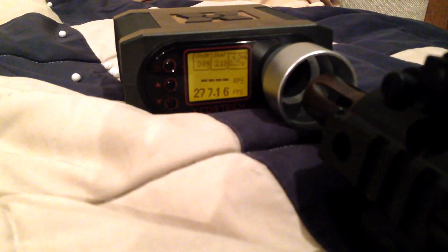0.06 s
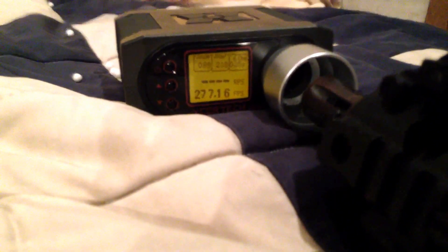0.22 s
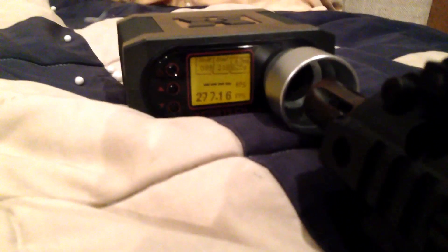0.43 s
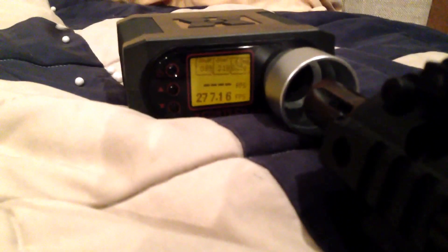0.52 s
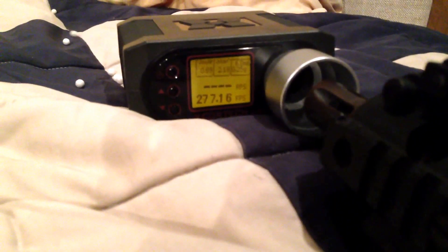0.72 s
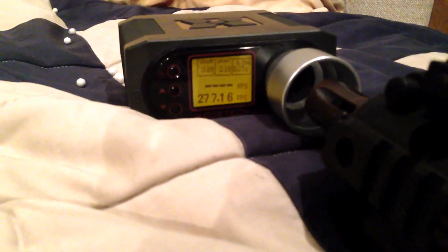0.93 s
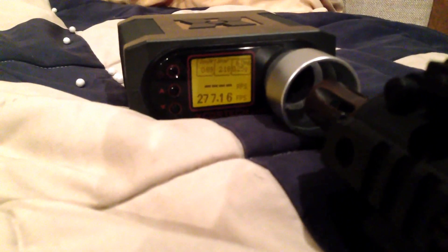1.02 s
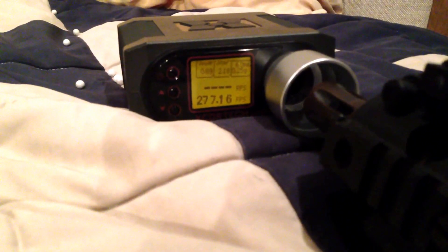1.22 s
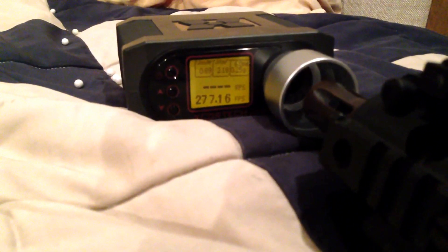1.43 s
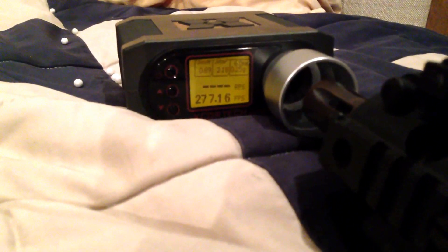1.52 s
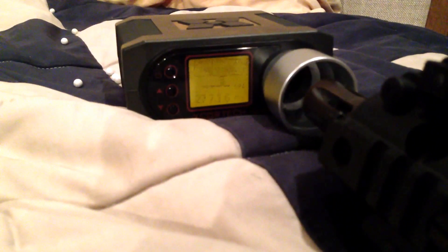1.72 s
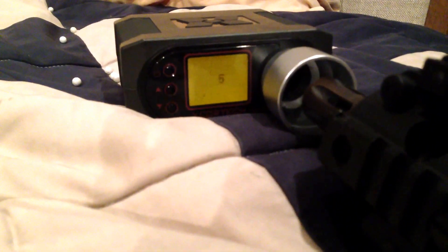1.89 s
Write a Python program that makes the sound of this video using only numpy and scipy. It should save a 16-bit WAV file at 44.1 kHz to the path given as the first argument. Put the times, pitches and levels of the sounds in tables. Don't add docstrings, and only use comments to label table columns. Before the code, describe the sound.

Close, loud and slightly saturated burst from a toy pellet gun, about nine strokes blurred into a buzzing rattle, ringing briefly in a bedroom; afterwards near quiet with faint hiss, small plastic ticks and dull drops.

```python
import sys
import numpy as np
from scipy import signal
from scipy.fft import rfft, irfft, next_fast_len
from scipy.io import wavfile
from scipy.ndimage import map_coordinates

SR = 44100
rng = np.random.default_rng(int(sys.argv[2]) if len(sys.argv) > 2 else 0)


def ratio(d):
    e = np.asarray(d, float) / 20
    return 10 ** e


def master(y):
    cut = np.clip(np.atleast_2d(y).T, -1, 1)
    pcm = np.round(cut * 32767)
    wavfile.write(sys.argv[1], SR, pcm.astype(np.int16))


N = 85995
T = np.arange(N) / SR


def unit(x):
    return x / np.sqrt(np.mean(x ** 2) + 1e-20)


def along(points, hz):
    f, v = np.transpose(points)
    return np.interp(np.log(hz + 1), np.log(f + 1), v)


def filtered(x, response):
    m = next_fast_len(len(x) + SR // 4)
    return irfft(rfft(x, m) * response(np.fft.rfftfreq(m, 1 / SR)), m)[:len(x)]


def coloured(x, points):
    return filtered(x, lambda f: ratio(along(points, f)))


def highpass(x, hz, order):
    return filtered(x, lambda f: (1j * f / (hz + 1j * f)) ** order)


def lowpass(x, hz):
    return filtered(x, lambda f: 1 / (1 + 1j * f / hz) ** 2)


def peaks(table, shift=1):
    def response(f):
        total = 0
        for k, (hz, width, db) in enumerate(table):
            drive = 1j * f * width
            total = total + (-1) ** k * ratio(db) * drive / ((hz * shift) ** 2 - f * f + drive)
        return total
    return response


def add(out, s, x):
    part = out[round(s * SR):][:len(x)]
    part += x[:len(part)]


def level_track(points):
    s, db = np.transpose(points)
    return np.interp(T, s, db, left=-120, right=-120)


def ring(hz, t60):
    t = np.arange(SR // 10) / SR
    return np.sin(2 * np.pi * hz * t) * ratio(-60 * t / t60)


def contacts(size, per_s, spread_db):
    chance, side, force = rng.random((size, 3)).T
    knocks = (chance < per_s / SR) * np.sign(side - .5)
    return unit(knocks * ratio(-spread_db * np.log(force + .01)))


def rattle(length, rise, t60, per_s, table, shift=1, fade_db=0, first=0):
    t = np.arange(SR // 10) / SR
    fall = ratio(-fade_db * t - 60 * np.clip(t - length, 0, 1) / t60)
    hits = contacts(len(t), per_s, 2.4) * np.clip(t / rise, 0, 1) * fall
    hits[round(rise * SR)] += first
    x = filtered(hits, peaks(table, shift))
    return x / (np.std(x[t < length + .002]) + 1e-9)


def hits(rows, modes):
    out = np.zeros(N)
    for s, db, length, shift in rows:
        first = 5 * (length < .005)
        add(out, s, ratio(db) * rattle(length, .00039, .011, 5000, modes, shift, first=first))
    return out


# start_s, slam_lag_s, rattle_s
STROKE_TIMES = [
    (.2335, .0003, .003),
    (.2362, .0022, .004),
    (.2447, .0016, .0025),
    (.2708, .0012, .004),
    (.2911, .0012, .0035),
    (.3124, .0004, .002),
    (.3303, .0001, .008),
    (.3496, .001, .003),
    (.3738, .001, .003),
]
# level_db, shell_knock_db
STROKE_FORCES = [
    (-18, -20.5),
    (-10.5, -7.5),
    (-7.5, -21),
    (-8.5, -29),
    (-9.5, -28),
    (-11, -30),
    (-8, -31),
    (-8.5, -30.5),
    (-7.5, -33),
]
# centre_hz, width_hz, level_db
GUN_BODY = [(745, 930, -10), (1404, 580, -5), (2840, 380, -3), (3300, 400, -3), (5370, 500, -11),
            (5950, 900, -12.5), (7240, 790, -13.5), (9960, 1900, -17.5), (11600, 3800, -25)]
PUFF_HZ, PUFF_T60, PUFF_DB = 1063, .0085, 5.5
SLAM_T60, SLAMS_PER_S = .008, 7000


def strokes():
    out = np.zeros(N)
    for (s, lag, length), (db, shell_db) in zip(STROKE_TIMES, STROKE_FORCES):
        tick = ring(2837 * (1 + .01 * rng.standard_normal()), .024)
        puff = ring(PUFF_HZ * (1 + .03 * rng.standard_normal()), PUFF_T60)
        shell = ring(276, .053)
        shift = 1 + .045 * rng.standard_normal()
        slam = rattle(length, .0004, SLAM_T60, SLAMS_PER_S, GUN_BODY, shift, fade_db=1199, first=2.5)
        add(out, s, ratio(db + PUFF_DB) * puff + ratio(shell_db) * shell)
        add(out, s + lag, ratio(db - 2.5) * tick + ratio(db - 3) * slam)
    return out


# start_s, level_db
REBOUND_HITS = [
    (.2525, -16),
    (.2805, -16.5),
    (.2755, -17.5),
    (.3100, -19),
    (.3165, -18.5),
    (.3400, -22),
    (.3555, -20.5),
    (.3838, -16.5),
]


def rebounds():
    out = np.zeros(N)
    for s, db in REBOUND_HITS:
        slam = rattle(.00071, .0003, SLAM_T60, SLAMS_PER_S, GUN_BODY)
        add(out, s, ratio(db + PUFF_DB) * ring(1.4 * PUFF_HZ, PUFF_T60) + ratio(db - 6) * slam)
    return out


# start_s, pitch_hz, level_db, length_s
INNER_PINGS = [(.2272, 5000, -20, .001), (.2405, 5200, -16, .002), (.2503, 14500, -25, .001),
               (.2768, 14500, -27, .0008), (.2972, 14600, -27, .0008), (.3088, 6300, -26, .002),
               (.3145, 8200, -24, .001), (.3172, 5000, -23, .001), (.3302, 7500, -23, .001),
               (.3325, 14500, -32, .001), (.3545, 12500, -22, .002), (.3530, 14300, -32, .003),
               (.3685, 4800, -25, .001), (.3768, 11300, -21, .001), (.3795, 14600, -26, .0008),
               (.3830, 12600, -33, .002)]


def pings():
    out = np.zeros(N)
    for s, hz, db, length in INNER_PINGS:
        add(out, s, ratio(db) * rattle(length, .0003, .008, 12000, [(hz, 340, 0)]))
    return out


# start_s, pitch_hz, t60_s, level_db
RECOIL_KICKS = [
    (.2290, 190, 0.096, -15),
    (.2330, 115, .09, -12.5),
    (.2390, 271.4, 0.068, -13),
    (.3150, 308, 0.08, -12.5),
    (.3120, 530, 0.032, -15),
    (.3745, 510, 0.041, -20),
]


def recoil():
    out = np.zeros(N)
    for s, hz, t60, db in RECOIL_KICKS:
        add(out, s, ratio(db) * ring(hz, t60))
    return out


# pitch_hz, level_db
BLAST_COLOUR = [(60, -59.5), (120, -21), (281, -1.5), (600, -5), (1620, -4.5), (3000, -6.5), (5070, -5),
                (10000, -11.5), (15500, -21)]


def reports():
    out = np.zeros(N)
    for (s, *_), (db, _) in zip(STROKE_TIMES, STROKE_FORCES):
        add(out, s, ratio(db + 14) * np.ones(1))
    return coloured(out, BLAST_COLOUR)


CATCH_S = .2248
# time_s, level_db
GEAR_LOAD = [(0.212, -61), (0.2229, -40.5), (0.2255, -15.5), (0.237, -12), (.252, -18), (.260, -32.5),
             (.268, -29.5), (.285, -21.5), (.365, -25.5), (.386, -27), (.392, -50.5)]
# pitch_hz, level_db
TOOTH_COLOUR = [(70, -32), (130, 0.5), (1680, -2.5), (3020, 1), (3880, -12.5), (4810, -4), (5600, -10.5),
                (12300, -16), (15800, -25)]


def gear_teeth():
    out = unit(coloured(contacts(N, 12000, 3), TOOTH_COLOUR)) * ratio(level_track(GEAR_LOAD))
    return np.where(T < CATCH_S - .001, lowpass(out, 3500), out)


def pinion_catch():
    out = np.zeros(N)
    add(out, CATCH_S, ratio(-19) * rattle(.002, .0005, .0068, 9000, [(7500, 600, 0)]))
    return out


# time_s, pitch_hz, level_db
WIND_UP = [
    (0.208, 1973, -57),
    (.218, 2459, -44.5),
    (0.2237, 3300, -26),
    (0.226, 3421, -43),
]


def motor_whine():
    s, hz, db = np.transpose(WIND_UP)
    phase = 2 * np.pi * np.cumsum(np.interp(T, s, hz)) / SR
    return np.sin(phase) * ratio(level_track(np.transpose([s, db])))


# start_s, level_db, rattle_s, pitch_factor
TRIGGER_CLICKS = [
    (.1935, -43.5, 0.0018, 0.985),
    (.1975, -53.5, .003, 0.59),
    (.2115, -50.5, .002, 0.495),
]
# centre_hz, width_hz, level_db
TRIGGER_MODES = [(2600, 280, 0.5), (3600, 740, -4.5), (5015, 1100, -5.5), (8200, 500, -6.5)]


def trigger():
    return hits(TRIGGER_CLICKS, TRIGGER_MODES)


# start_s, level_db, rattle_s, pitch_factor
CASE_BOUNCES = [
    (1.1822, -37.5, 0.003, 0.99),
    (1.1915, -52, .005, 1),
    (1.2040, -64, .008, 0.99),
    (1.4360, -45.5, 0.003, 1),
    (1.4412, -47, 0.003, 0.99),
    (1.4490, -59, .002, 1),
    (1.4555, -59, .003, 1.02),
    (1.4625, -61, .002, 1.05),
]
# centre_hz, width_hz, level_db
CASE_MODES = [(1030, 100, 0), (2020, 100, -5), (2600, 170, -2), (3400, 900, -19), (5030, 200, -12),
              (7650, 900, -30)]


def case_clicks():
    return hits(CASE_BOUNCES, CASE_MODES)


# start_s, level_db, rattle_s, pitch_factor
PANEL_BOUNCES = [
    (.8522, -43.5, 0.002, 1),
    (.8572, -50, .001, 1),
    (.8630, -60, .002, 1),
    (1.3770, -66.5, .002, 0.97),
]
# centre_hz, width_hz, level_db
PANEL_MODES = [(420, 100, -17), (800, 250, -14), (1740, 90, -1), (2170, 90, 0), (4600, 1200, -23),
               (8800, 900, -23)]


def panel_clicks():
    return hits(PANEL_BOUNCES, PANEL_MODES)


# start_s, level_db, rattle_s, pitch_factor
TOCK_BOUNCES = [
    (1.4990, -57.5, .003, 1),
    (1.5035, -63, .003, 1),
    (1.1200, -73, .003, 1.15),
    (.7550, -77, .045, .99),
]
# centre_hz, width_hz, level_db
TOCK_MODES = [(1115, 60, 0), (2800, 500, -22), (5200, 500, -22)]


def tocks():
    return hits(TOCK_BOUNCES, TOCK_MODES)


# start_s, level_db, rattle_s, pitch_factor
TICK_HITS = [(.8510, -56, 0.00622, 1.69), (.8885, -52.5, 0.00088, 0.836), (.8915, -64, .003, .85),
             (1.1470, -48.5, 0.01026, 0.998), (1.1820, -57, 0.0028, 1.164), (1.2070, -64, .004, 0.836),
             (1.3320, -69.5, 0.0025, 2.2), (1.3780, -61, 0.00135, 0.853), (1.4360, -61.5, 0.0014, 1.035),
             (1.4540, -70, 0.0041, 1.1), (1.4955, -64.5, 0.007, 1.12)]
# centre_hz, width_hz, level_db
TICK_MODES = [(2980, 1340, -0.5), (4975, 1600, -1.5), (7715, 926, -3), (10940, 1490, -6)]


def ticks():
    return hits(TICK_HITS, TICK_MODES)


# start_s, level_db, rattle_s, pitch_factor
THUD_HITS = [(.4800, -54.5, 0.0205, 0.69), (.7200, -84, 0.022, 0.55), (.9545, -54, 0.0029, 1.06),
             (.9650, -49.5, 0.0018, 0.937), (.9920, -60.5, 0.00536, 1.08), (1.0150, -66, .02, 0.746),
             (1.0700, -73.5, 0.00556, 1.06), (1.1180, -57, 0.012, 0.51), (1.1850, -63.5, 0.00354, 0.95),
             (1.2840, -63, 0.0288, 0.67), (1.3340, -56, 0.0028, 1.353), (1.4370, -61.5, 0.01, 0.853),
             (1.4840, -62, 0.0039, 1.085)]
# centre_hz, width_hz, level_db
BEDDING_MODES = [(240.7, 89, 5), (450, 81, -9.5)]


def thuds():
    return lowpass(highpass(hits(THUD_HITS, BEDDING_MODES), 110, 4), 600)


# end_s, pitch_hz, level_db, length_s
SCRAPE_EVENTS = [
    (.1935, 2500, -60, .008),
    (.8525, 2150, -54, .008),
    (1.1800, 1040, -56, .012),
    (1.1825, 2300, -57, .014),
    (1.4362, 2700, -60, .006),
    (1.5000, 1100, -66, .006),
]


def scrapes():
    out = np.zeros(N)
    for end, hz, db, length in SCRAPE_EVENTS:
        mode = [(hz, 350, 0)]
        rub = rattle(length, length, .011, 12000, mode)
        add(out, end - length, ratio(db) * filtered(rub, peaks(mode)))
    return out


# pitch_hz, t60_s
ROOM_T60 = [(150, 0.23), (1000, 0.49), (3000, 0.47), (7000, .3), (14000, 0.18)]


def room(x, pieces, scale):
    out = np.zeros(N)
    edges = [0] + [round(s * SR) for s in pieces] + [N]
    for a, b in zip(edges, edges[1:]):
        hz, t, z = signal.stft(rng.standard_normal(SR), SR, nperseg=256)
        fall_db = -60 * t / (scale * along(ROOM_T60, hz)[:, None])
        decay = ratio(fall_db) + ratio(-27.5 + fall_db / 1.5)
        tail = signal.istft(z * decay, SR, nperseg=256)[1]
        echo = signal.fftconvolve(x[a:b], tail / np.linalg.norm(tail))
        add(out, a / SR + .0044, echo)
    return out


def noise(points):
    return unit(coloured(rng.standard_normal(N), points))


def wander(per_s):
    return map_coordinates(rng.standard_normal(40), [T * per_s])


# time_s, level_db
RECORDER_GAIN = [
    (0, -68.5),
    (.22, -66),
    (0.401, -78.5),
    (0.799, -75),
    (1.2, -71),
    (1.6, -70),
    (1.95, -69),
]
# pitch_hz, level_db
HISS_COLOUR = [(350, -37), (600, -2.5), (1170, -6.5), (1620, -5), (1850, -6.5), (2200, -3), (3770, -1.5),
               (15500, -6)]


def hiss():
    return noise(HISS_COLOUR) * ratio(level_track(RECORDER_GAIN) + 1.5)


# pitch_hz, level_db
RUMBLE_COLOUR = [(35, -45), (70, -24), (110, -14.5), (160, -1.5), (270, -3), (430, -11), (700, -20.5),
                 (1000, -60.5)]


def rumble():
    duck_db = .6 * (level_track(RECORDER_GAIN) - RECORDER_GAIN[-1][1])
    return noise(RUMBLE_COLOUR) * ratio(-74 + 2 * wander(14) + duck_db)


# pitch_hz, rms_db
HUM_TONES = [
    (850, -85.5),
    (1100, -86),
]


def hum():
    out = np.zeros(N)
    for hz, db in HUM_TONES:
        out += ratio(db + 2.5 * wander(18)) * np.sqrt(2) * np.sin(2 * np.pi * hz * T)
    return out * (T > .46) * (T < 1.13)


# pitch_hz, level_db
FAR_CONTACT_COLOUR = [(300, -3), (1050, -16), (1400, -2), (1750, -14), (2150, -13), (2700, -4), (3500, -2),
                      (8000, -4)]


def scene():
    gun = highpass(strokes() + pings() + rebounds(), 140, 2) + recoil()
    gun += gear_teeth() + motor_whine() + pinion_catch()
    small = trigger() + case_clicks() + panel_clicks() + tocks() + ticks() + thuds() + scrapes()
    near = room(ratio(-28.5) * gun + reports(), [row[0] - .003 for row in STROKE_TIMES], .9913)
    far = room(ratio(-5.5) * coloured(small, FAR_CONTACT_COLOUR), [.5, .87, 1.1, 1.17, 1.3, 1.47], .69)
    return (gun + small + near + far + hiss() + rumble() + hum())[None]


def roll_off(x):
    return signal.sosfilt(signal.butter(12, 16320, fs=SR, output="sos"), x)


def record(dry):
    x = highpass(dry[0], 80, 2)
    x = x / (1 + np.abs(x / .97) ** 6) ** (1 / 6)
    x = filtered(x, lambda f: 1 / (1 + (f / 15450) ** 80))
    return roll_off(x[None])


dry = scene()
out = record(dry)
master(out)
```